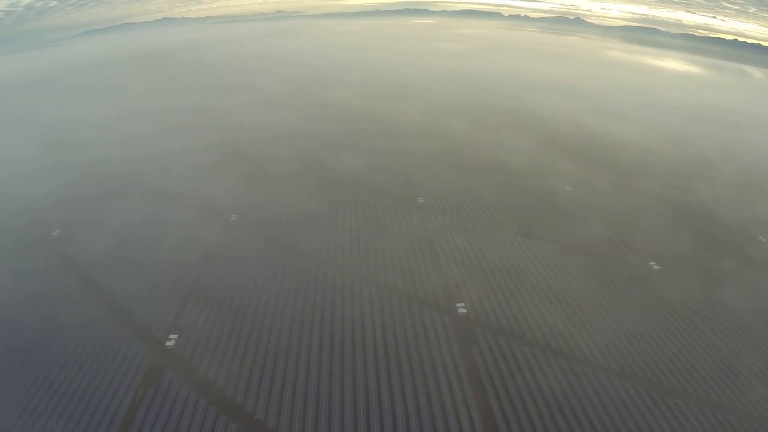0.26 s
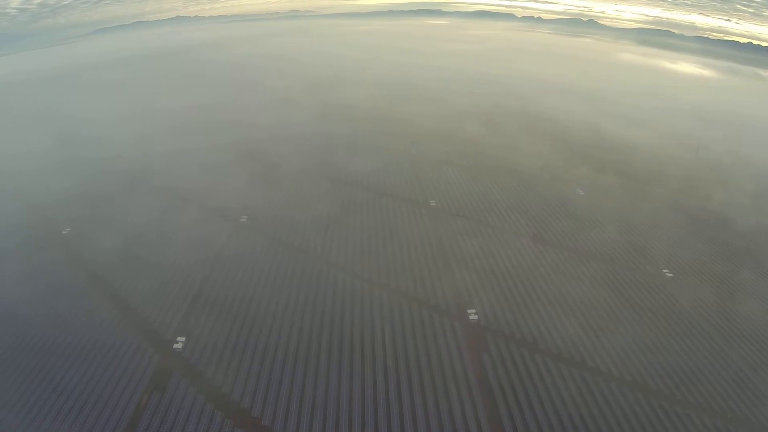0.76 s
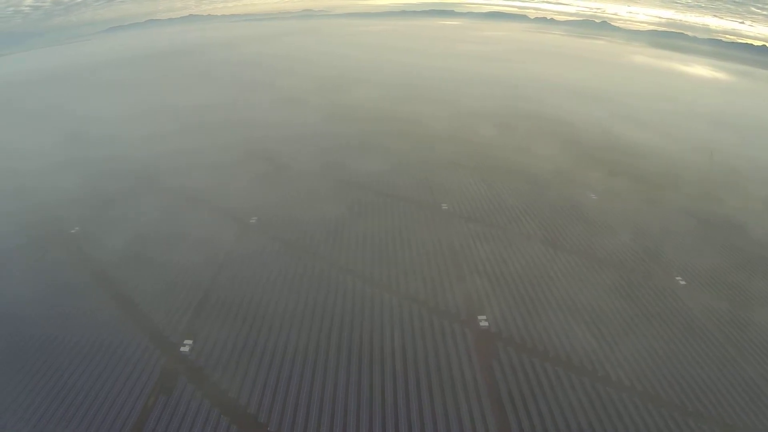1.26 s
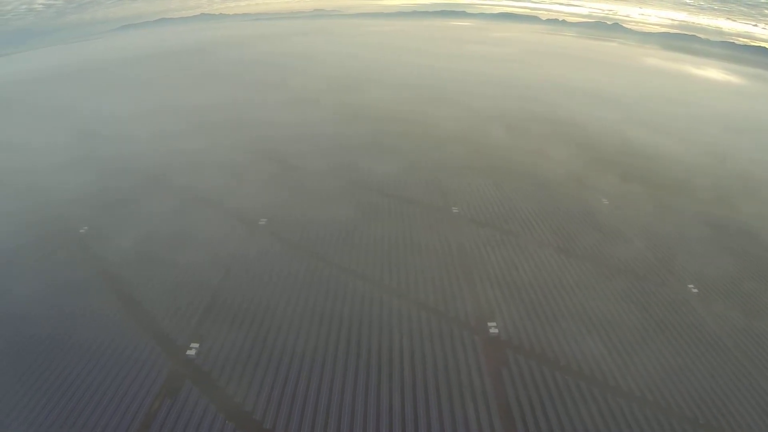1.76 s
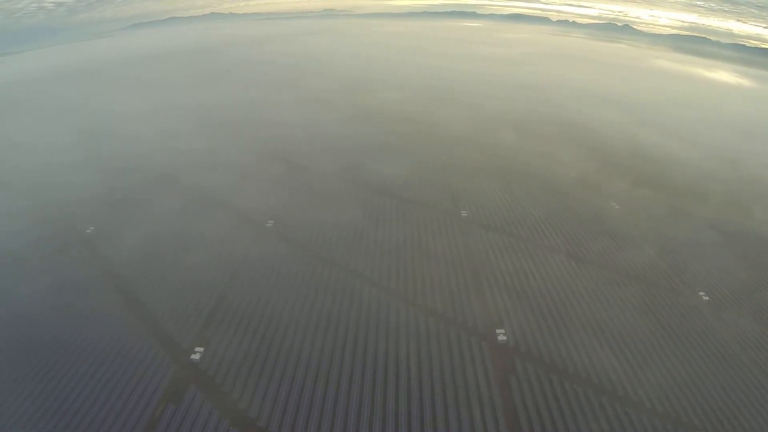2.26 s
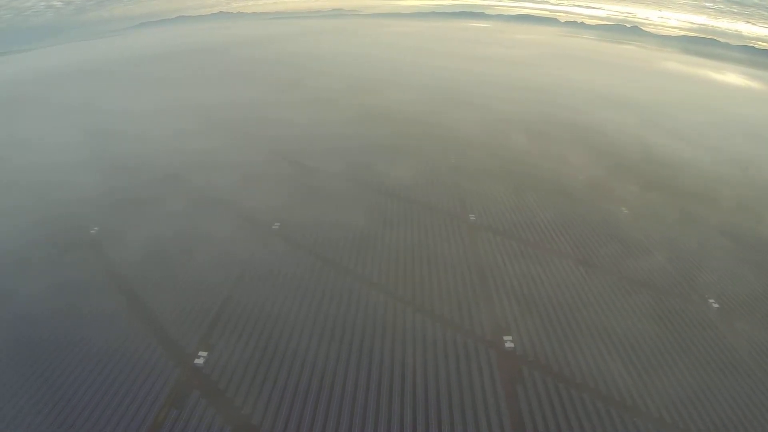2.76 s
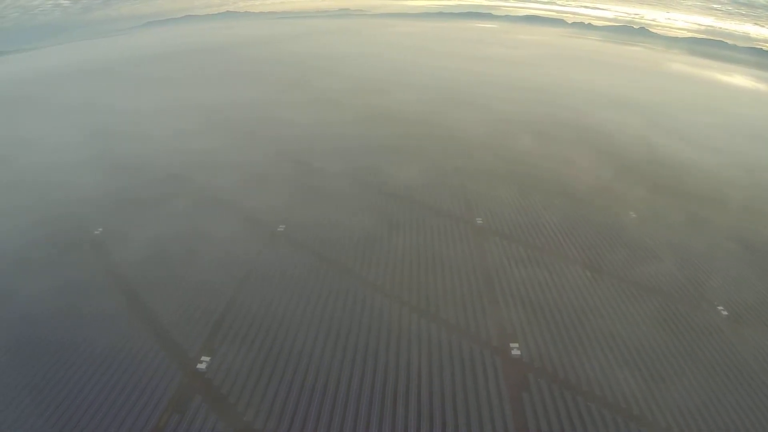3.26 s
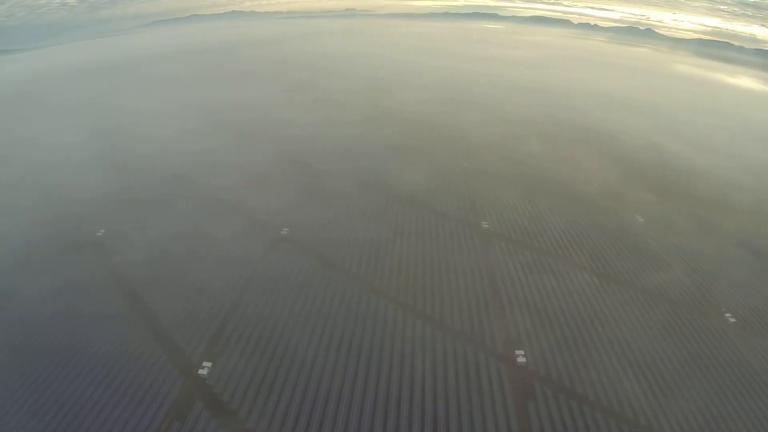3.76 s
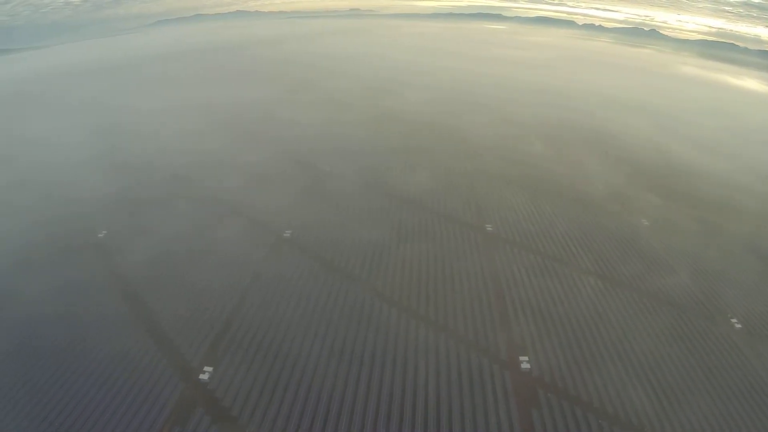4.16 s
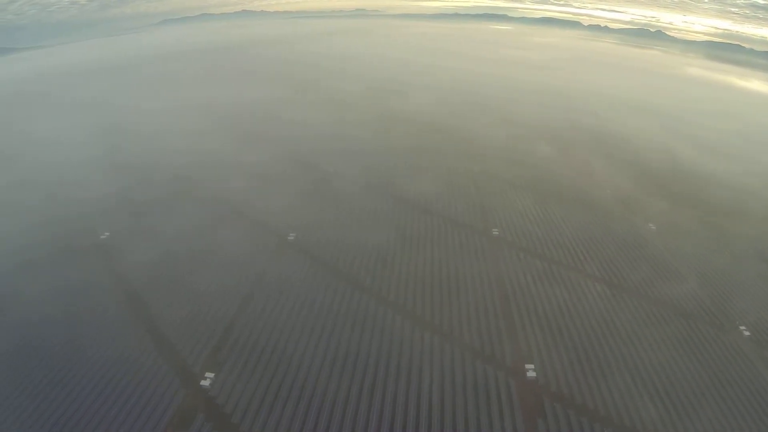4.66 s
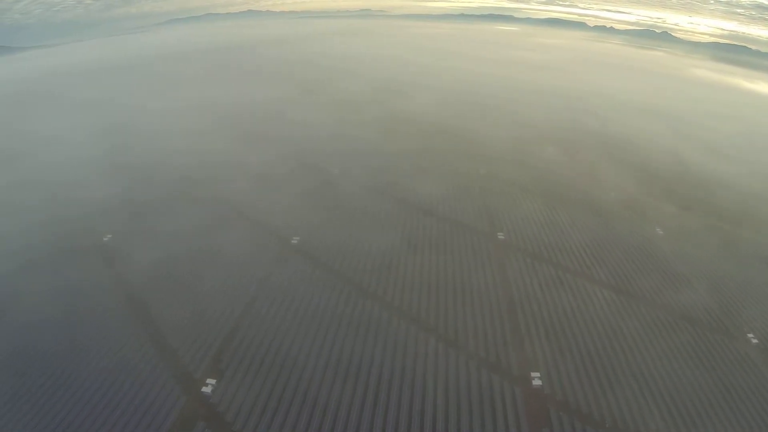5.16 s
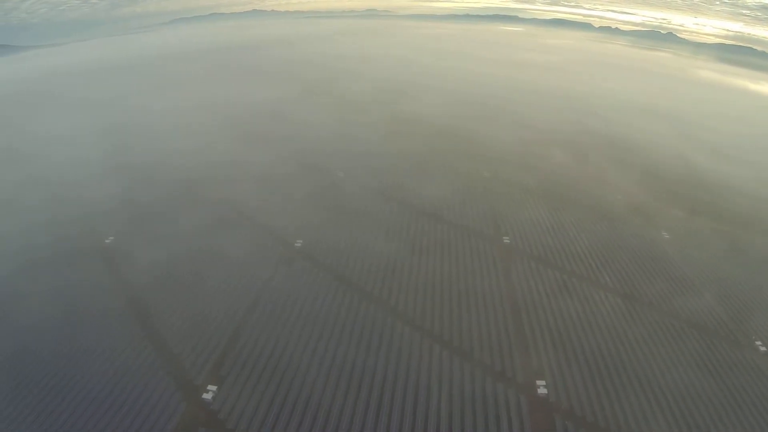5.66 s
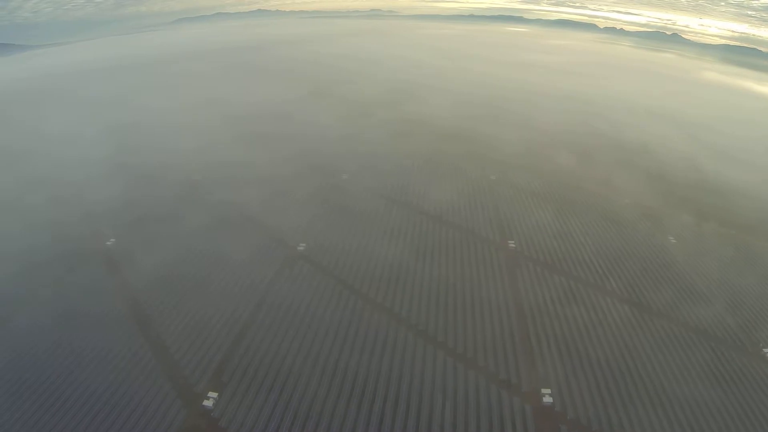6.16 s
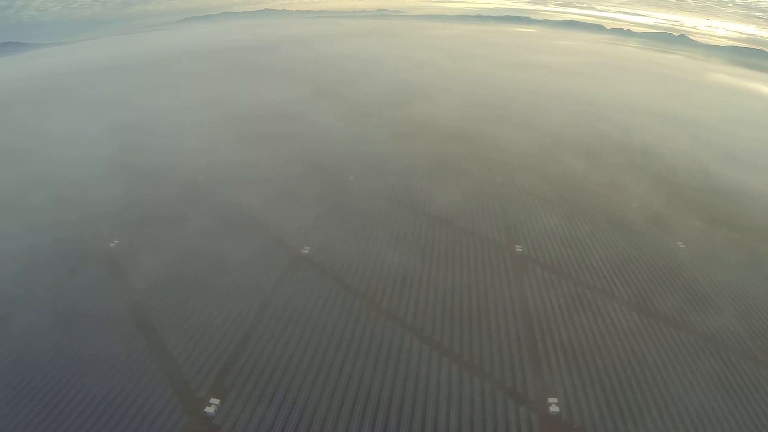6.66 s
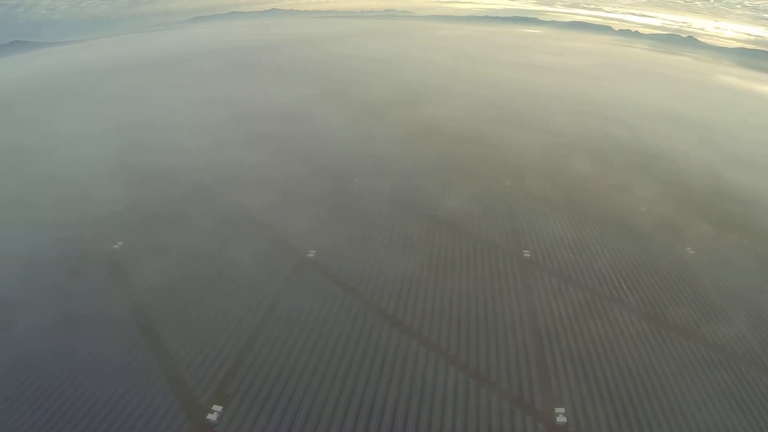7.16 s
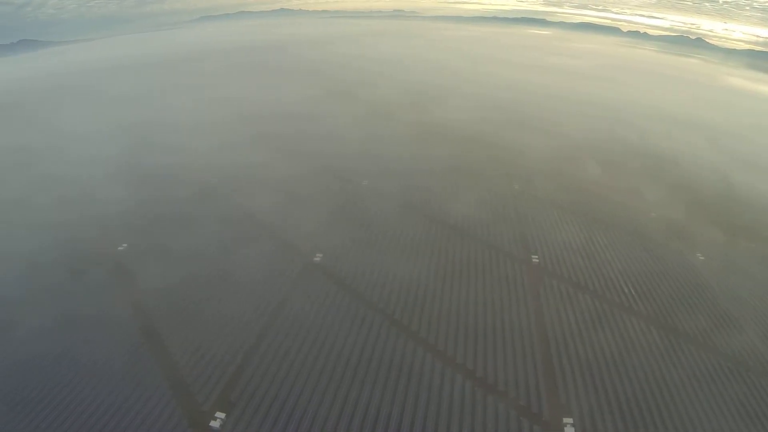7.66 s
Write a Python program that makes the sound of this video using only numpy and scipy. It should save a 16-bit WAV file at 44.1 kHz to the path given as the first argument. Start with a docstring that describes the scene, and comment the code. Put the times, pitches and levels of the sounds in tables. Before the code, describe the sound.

Outdoors high in the air, very close microphone on a drone. Loud, distorted wind buffets come first, thuds and crackling snaps over a fast blade flutter. They weaken after three seconds and stop around four. What remains is a full, constant low drone of propellers, slightly wavering, with shaking rumble beneath, a soft fluttering air rush that grows somewhat around six seconds, and a thin, faint electric whine.

```python
"""The nearest propeller of a multirotor drone hums as two blades pass, heard from the camera that it carries.
For about three seconds eddies pop on the microphone port, the weak ones in step with the blades, each a dip
in pressure with a crack; they make the camera turn its gain down. The airflow then smooths into a pulsing
rush of shaped noise, the gain creeps back and the hum swells. The mount's resonances shake the microphone,
propeller wash rumbles, and the motors whine faintly as unsteady sine tones over a hiss."""
import sys
import numpy as np
from scipy import signal
from scipy.fft import rfft, irfft, next_fast_len
from scipy.io import wavfile
from scipy.ndimage import uniform_filter1d, minimum_filter1d

SR = 44100
rng = np.random.default_rng(int(sys.argv[2]) if len(sys.argv) > 2 else 0)


def transcribe(signal):
    """Save signal, clipped to [-1, 1], as a 16-bit WAV file at the path in sys.argv[1]."""
    frames = np.atleast_2d(signal).T
    limited = np.clip(frames, -1, 1)
    pcm = np.round(limited * 32767).astype(np.int16)
    wavfile.write(sys.argv[1], SR, pcm)


N = 348831
TIME = np.arange(N) / SR

# turning rate of the nearest rotor: t/s, f/Hz (turns per second)
ROTOR_SPEED = [(0.0, 104.69), (0.74, 106.11), (1.73, 105.92), (2.22, 106.87), (2.47, 106.0), (2.97, 106.75),
               (3.96, 106.15), (4.45, 106.52), (4.7, 107.15), (5.44, 106.73), (5.93, 105.58),
               (6.43, 106.22), (7.17, 105.51), (7.91, 105.72)]
# weaker rotor tones: t/s, then level/dB at once, three times and four times the turning rate
OVERTONE_LEVELS = [(2.0, -23.5, -21.5, -41.5), (3.7, -21, -31, -39.5), (4.8, -26, -35.5, -40.5),
                   (6.0, -26.5, -40.5, -40)]
# strength of the smooth airflow: t/s, relative level/dB
AIRFLOW = [(0, -30), (2, -31.5), (2.5, -35), (3.3, -38), (4, -35.5), (4.7, -35), (6, -28), (6.7, -28),
           (7, -32), (7.3, -29), (7.9, -30)]
# resonances of the camera mount: f/Hz, width/Hz, relative level/dB
MOUNT_RESONANCES = [(42, 4, -7), (48, 2, -4), (61.5, 4, 0), (75, 4, -7), (83.5, 5, -5), (107, 3, -6),
                    (129, 5, -3), (137, 2, -3), (151, 6, -1), (165, 5, -4), (224, 3, -9), (255, 3, -3.5),
                    (274, 3, -10)]
# strong eddies on the port: t/s, relative suction level/dB, relative crack level/dB, crack f/Hz
STRONG_EDDIES = [(0.1238, 9.5, 10, 1170), (0.2968, 10.5, 7, 1130), (0.3715, 11, 6, 1100),
                 (0.4289, 11.5, -17, 1700), (0.4386, 9.5, 5, 1300), (0.496, 15, 9.5, 1700),
                 (0.6647, 9, 10.5, 1300), (0.7458, 5.5, 9.5, 1570), (0.8067, 4, 13, 1480),
                 (0.8168, 9, -2, 1400), (0.865, 2, -18, 1250), (0.9203, 9, 8.5, 1280),
                 (0.9298, 8.5, 3.5, 2450), (1.0628, 12, -4, 1100), (1.2033, 8, 5, 1150), (1.24, 8, 7, 1300),
                 (1.2693, 6.5, 9.5, 1300), (1.3115, -9, 2.5, 1280), (1.3349, -9, 5, 1400),
                 (1.3442, 6, 5, 2100), (1.3817, -2, 1, 1450), (1.3915, 13.5, -7, 1200),
                 (1.5049, 10, 9, 1200), (1.6172, 10, -18, 1500), (1.703, -1, 8, 1130), (1.779, 17, 5, 1700),
                 (1.8448, 13, 6, 2450), (2.0037, 8, 0, 1490), (2.0137, -3, 5, 1470), (2.117, 7, 11.5, 1100),
                 (2.154, 12.5, -8, 1100), (2.2295, 8.5, 6.5, 1090), (2.249, 6.5, 4.5, 2460),
                 (2.2668, 7, 5, 1190), (2.3515, 11.5, 9, 1300), (2.4751, 8.5, 2, 2450),
                 (2.5025, 2, 3, 2150), (2.5115, -16, 3.5, 1650), (2.5397, 11, 6.5, 1700),
                 (2.6067, 3, 5.5, 1090), (2.7003, -7, 12.5, 1230), (2.748, 7, 4, 1090),
                 (2.7658, 2, -2, 1300), (2.7948, 7.5, 6, 1380), (2.8414, -8, 7.5, 1350),
                 (2.8596, -3, 6.5, 1080), (2.879, -1.5, -2, 1220), (2.9263, -2, -6, 1850),
                 (2.9349, 1, -1.5, 1100), (3.0199, 1.5, -2, 1830), (3.0379, -5, 3, 1530),
                 (3.1046, 0.5, -0.5, 2290), (3.1228, -15, -8, 1850), (3.1701, 3.5, -0.5, 1780),
                 (3.1883, -3, -3, 2000), (3.2164, -3.5, -5.5, 1300), (3.2553, -1, -11, 1070),
                 (3.3861, -6, -9, 1430), (3.414, -5.5, 0, 1080), (3.4803, -5, -5.5, 1640),
                 (3.6776, -3.5, 0.5, 1510), (3.823, -34, -10.5, 1080)]
# weak eddies in between: t/s, typical relative level/dB
WEAK_EDDY_LEVEL = [(0, -0.5), (.2, -9.5), (.42, -1.5), (.58, -8.5), (.78, -4), (1.05, -8.5), (1.35, -1),
                   (1.6, -11.5), (1.8, -6), (1.96, -2), (2.15, -9), (2.5, -13), (3.6, -22.5), (4.1, -69)]
# noise spectrum of the turbulent rush: f/Hz, relative level/dB per Hz
RUSH_SPECTRUM = [(30, -15), (60, -0.5), (150, -1), (280, -7), (420, -2), (700, 2.5), (1000, -1), (1600, -7),
                 (2500, -15), (4000, -25.5), (7000, -35), (15000, -37)]
# noise spectrum of the propellers' wash: f/Hz, relative level/dB per Hz
WASH_SPECTRUM = [(30, 2), (60, 12), (130, 6.5), (200, 4.5), (330, 2.5), (480, 1.5), (900, -26), (2000, -59),
                 (15000, -85)]
# noise spectrum of the hiss: f/Hz, relative level/dB per Hz
HISS_SPECTRUM = [(100, 29.5), (1500, -9), (2900, 17.5), (4000, 8.5), (5500, 8.5), (7000, 3), (9500, 2.5),
                 (12500, 2.5), (14500, -1), (15500, -7)]
# whine of the loudest far motor, following the throttle: t/s, f/Hz
THROTTLE_PITCH = [(3.2, 4702), (4.31, 4681), (5.1, 4691), (5.57, 4673), (5.82, 4713), (6.91, 4695),
                  (7.55, 4743)]
# whines that follow the throttle: ratio to its pitch, relative level/dB
FAR_MOTOR_WHINES = [(.585, -4), (.987, -10), (1, -1), (1.137, -3.5), (1.225, -11), (2.274, -18)]

HUM_DB = -13   # rms level of the blade-passing tone, at twice the turning rate
# gain control: peak level allowed, and the part of a cut that is held
CEILING_DB, HELD_CUT_DB = 1.6, 6.5
SLOW_RELEASE_DB_PER_S, FAST_RELEASE_DB_PER_S = 5.5, 123
ATTACK_S = .0012
CUTOFF_HZ = 15350   # upper band limit of the camera


def from_db(db):
    """Level and amplitude: a gain is ten to the power of dB / 20."""
    return 10 ** (np.asarray(db) / 20)


def rms_one(x):
    """Normalisation: division by the root mean square gives unit power."""
    return x / np.sqrt(np.mean(x ** 2) + 1e-20)


def in_time(rows):
    """Linear interpolation: each column of a curve at every sample."""
    knot_s, *columns = np.transpose(rows)
    return [np.interp(TIME, knot_s, column) for column in columns]


def drift(rate_hz):
    """Low-pass noise: two equal poles at rate_hz leave a slow random variation, rms 1."""
    step = 40   # samples between computed values
    pole = np.exp(-2 * np.pi * rate_hz * step / SR)
    settle = 2000   # values discarded while the filter settles
    white = rng.standard_normal(N // step + settle + 2)
    slow = rms_one(signal.lfilter([1], [1, -2 * pole, pole * pole], white)[settle:])
    return np.interp(np.arange(N) / step, np.arange(len(slow)), slow)


def noise(spectrum):
    """Spectral shaping: white noise weighted in the frequency domain, rms 1."""
    hz, db = np.transpose(spectrum)
    size = next_fast_len(N)
    bin_hz = np.maximum(np.arange(size // 2 + 1) * SR / size, 1)
    low_rolloff = np.minimum(bin_hz / hz[0], 1) ** 2
    gain = from_db(np.interp(np.log(bin_hz), np.log(hz), db)) * low_rolloff
    return rms_one(irfft(rfft(rng.standard_normal(size)) * gain, size)[:N])


def narrow_noise(hz, width_hz):
    """Quadrature modulation: two slow noises make a tone of wandering strength and phase, rms 1."""
    angle = 2 * np.pi * hz * TIME
    return rms_one(drift(width_hz / 2) * np.cos(angle) + drift(width_hz / 2) * np.sin(angle))


def add(out, centre_s, sound):
    """Superposition: a short sound is summed in, centred on its time."""
    at = int(round(centre_s * SR)) - len(sound) // 2 + np.arange(len(sound))
    inside = (at >= 0) & (at < N)
    out[at[inside]] += sound[inside]


def whine(hz, db):
    """Magnetic excitation: a motor's tone, unsteady as the controller trims its speed."""
    unsteady_hz = hz * (1 + .0013 * drift(7))
    angle = 2 * np.pi * np.cumsum(unsteady_hz) / SR
    return np.sqrt(2) * from_db(db + 1.2 * drift(14)) * np.sin(angle)


def motors(speed):
    """Frequency ratios: near whines scale with the rotor's speed, far ones with the throttle pitch."""
    throttle_hz, = in_time(THROTTLE_PITCH)
    pole_hz = 84 * speed   # magnetic cycles per turn
    near = whine(pole_hz, db=-9) + whine(pole_hz * 3 / 4, db=-18)
    far = sum(whine(ratio * throttle_hz, db) for ratio, db in FAR_MOTOR_WHINES)
    return near + far


def mount_sway():
    """Resonance: the camera shakes on its dampers in many narrow bands, rms 1."""
    bands = (from_db(db) * narrow_noise(hz, width_hz) for hz, width_hz, db in MOUNT_RESONANCES)
    return rms_one(sum(bands))


def rumble(sway, sway_db=-20.0, wash_db=-24.0):
    """Low-frequency excitation: mount shaking and the propellers' wash reach the microphone."""
    return from_db(sway_db) * sway + from_db(wash_db) * noise(WASH_SPECTRUM)


def rush(turns, sway, depth=0.34):
    """Amplitude modulation: port turbulence pulses with blade passes and sway, in small lumps; rms 1."""
    swell = 1 - depth * np.cos(4 * np.pi * turns + 1)
    lumps_db = 2.0 * drift(110) + .5 * drift(14)
    return rms_one(noise(RUSH_SPECTRUM) * swell * from_db(lumps_db - 1.3 * sway))


def eddy(suction_db, crack_db, crack_hz, chance):
    """Vortex suction: pressure sinks and snaps back; the core cracks, with a twin, amid a brief churn."""
    build_s, release_s = .00055, .00032   # before the random widening
    twin_db, churn_db, churn_s = -7, -21, .0007   # levels relative to the crack
    t = np.arange(-256, 256) / SR
    widening = from_db(2.7 * np.clip(chance[0], -2, 1.7))
    width_s = np.where(t < 0, build_s, release_s) * widening
    suction = -1 / (1 + (t / width_s) ** 2) ** 2

    # a passing vortex gives a pulse whose spectrum peaks at crack_hz and falls exponentially
    twin_lag_s = .0004 * chance[2]
    core, twin = (1 / (1 - 1j * np.pi * crack_hz * (t - lag_s)) ** 3 for lag_s in (0, twin_lag_s))
    turned_core = -np.exp(1.3j * chance[1]) * core   # random phase
    turned_twin = from_db(twin_db) * np.exp(2j * chance[3]) * twin
    crack = np.real(turned_core + turned_twin)

    band_hz = [crack_hz / 2, min(crack_hz * 2, SR / 3)]
    band = signal.butter(1, band_hz, "band", fs=SR, output="sos")
    churn = uniform_filter1d(signal.sosfilt(band, chance[4:]), size=5)
    churn = rms_one(churn) * np.exp(-np.abs(t) / churn_s)
    return from_db(suction_db) * suction + from_db(crack_db) * (crack + from_db(churn_db) * churn)


def weak_eddies(turns, sway, suction_db=3, crack_db=-5.5, crack_hz=1500, gust_sharpens=0.21, gust_from_db=-10):
    """Periodic shedding: each blade throws an eddy, one harder; sway and chance set how near it passes."""
    second_blade_db, sway_db, sharp_spread_db = -13, 10, 4.5
    out = np.zeros(N)
    strong_times_s = np.array(STRONG_EDDIES)[:, 0]
    level_db, = in_time(WEAK_EDDY_LEVEL)
    passes = np.flatnonzero(np.diff(np.floor(2 * turns - .5)) > 0)
    for i, chance in zip(passes, rng.standard_normal((len(passes), 519))):
        eddy_s = i / SR + .00012 + .00036 * chance[0]
        # none in near-calm air or within 2.5 ms of a strong eddy
        if level_db[i] <= -42 or np.abs(strong_times_s - eddy_s).min() <= .0025:
            continue
        nearness = np.clip(1.07 * sway[i] + 0.77 * chance[-1], -2, 2 / 3)
        blade_db = second_blade_db * (turns[i] % 1 > .5)
        db = level_db[i] + sway_db * nearness + blade_db
        # small eddies tick, wide ones thud; a gust makes them smaller and brighter
        gust_db = gust_sharpens * max(level_db[i] - gust_from_db, 0)
        sharp_db = sharp_spread_db * np.clip(chance[1], -1, 1)
        hz = crack_hz * from_db(2.8 * np.clip(chance[2], -2, 1.4) + gust_db)
        dip_db = db + suction_db - sharp_db - gust_db
        add(out, eddy_s, eddy(dip_db, db + crack_db + sharp_db, hz, chance[3:]))
    return out


def strong_eddies(suction_db=2, crack_db=-1.5):
    """Impulsive pressure: the loud pops, each a dip and a crack at its own time."""
    out = np.zeros(N)
    chances = rng.standard_normal((len(STRONG_EDDIES), 516))
    for (eddy_s, suction, crack, hz), chance in zip(STRONG_EDDIES, chances):
        add(out, eddy_s, eddy(suction + suction_db, crack + crack_db, hz, chance))
    return out


def buffets(turns, sway):
    """Pressure equalisation: the capsule leaks, so a soft overshoot follows each dip in pressure."""
    leak = signal.butter(1, 90, "high", fs=SR, output="sos")
    return signal.sosfilt(leak, strong_eddies() + weak_eddies(turns, sway))


def propeller(turns, waver_db=1.0, overtone_waver_db=3.5):
    """Blade-passing tone: two blades sound at twice the turning rate; imbalance adds odd multiples."""
    once_db, third_db, fourth_db = (db + overtone_waver_db * drift(43) for db in in_time(OVERTONE_LEVELS))
    angle = 2 * np.pi * (turns - 1 / 4)
    once = from_db(once_db) * np.cos(angle)
    blades = from_db(HUM_DB + waver_db * drift(45)) * np.cos(2 * angle)
    overtones = from_db(third_db) * np.cos(3 * angle) + from_db(fourth_db) * np.cos(4 * angle)
    return np.sqrt(2) * (once - blades - overtones)


def released(cut_db, db_per_s):
    """Peak holding: a cut jumps up at once and falls back at a steady rate."""
    return np.maximum.accumulate(cut_db + db_per_s * TIME) - db_per_s * TIME


def gain_control(x):
    """Compression: peaks over the ceiling cut the gain; part returns fast, the held cut in about a second."""
    over_db = np.maximum(20 * np.log10(np.abs(x) + 1e-9) - CEILING_DB, 0)
    over_db[0] = HELD_CUT_DB   # the buffeting is already under way
    held_db = released(np.minimum(over_db, HELD_CUT_DB), SLOW_RELEASE_DB_PER_S)
    cut_db = np.maximum(released(over_db, FAST_RELEASE_DB_PER_S), held_db)
    # the centred windows ease the gain down just ahead of a peak
    span = int(ATTACK_S * SR)
    lowest_db = minimum_filter1d(-cut_db, size=span)
    return x * from_db(uniform_filter1d(lowest_db, size=span))


def scene(rush_db=3, hiss_db=-43, whine_db=-54.5):
    """Superposition of sources: one rotor phase times the hum, the rush and the weak eddies."""
    speed, = in_time(ROTOR_SPEED)
    turns = np.cumsum(speed) / SR + 1 / 6
    air_db, = in_time(AIRFLOW)
    sway = mount_sway()
    treble = from_db(hiss_db) * noise(HISS_SPECTRUM) + from_db(whine_db) * motors(speed)
    wind = buffets(turns, sway) + from_db(air_db + rush_db) * rush(turns, sway)
    return (treble + rumble(sway) + wind + propeller(turns))[None]


def record(dry):
    """Limiting and band limitation: the gain rides, peaks round off at full scale, the top is cut."""
    x = gain_control(dry[0])
    rounded = x / (1 + x ** 8) ** (1 / 8)
    top_cut = signal.ellip(12, .1, 90, CUTOFF_HZ, fs=SR, output="sos")
    return signal.sosfilt(top_cut, rounded)[None]


dry = scene()
out = record(dry)
transcribe(out)
```